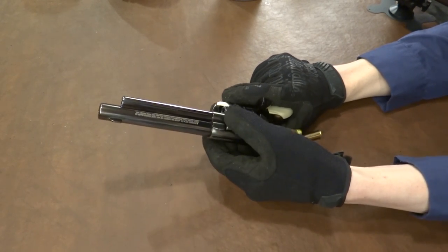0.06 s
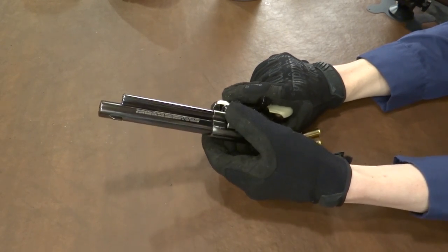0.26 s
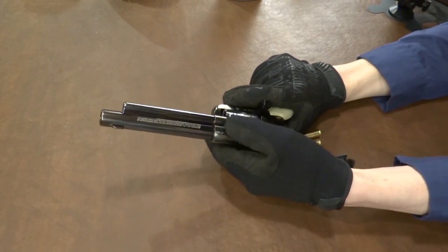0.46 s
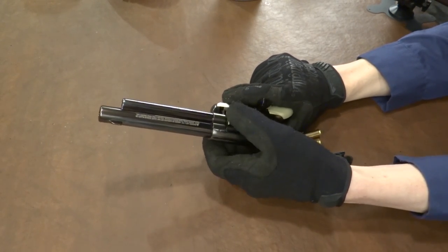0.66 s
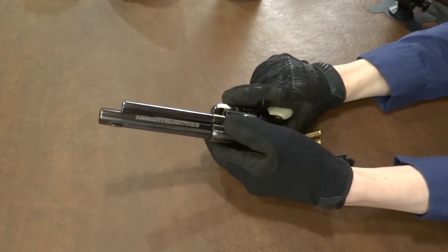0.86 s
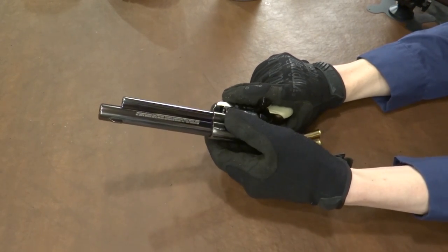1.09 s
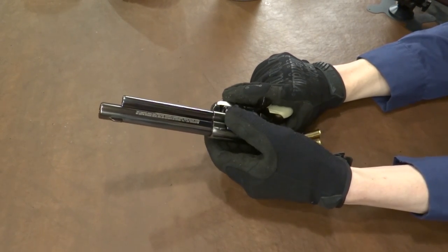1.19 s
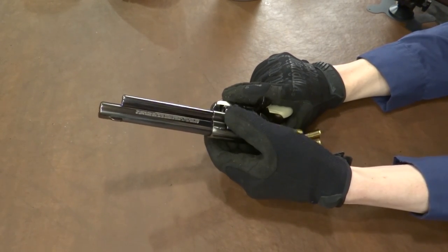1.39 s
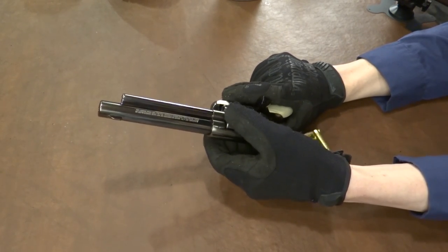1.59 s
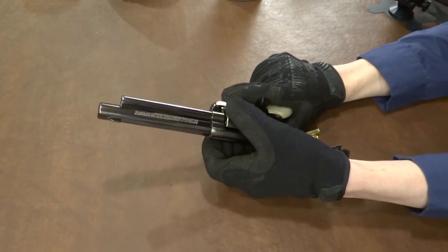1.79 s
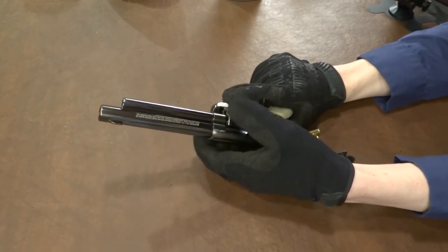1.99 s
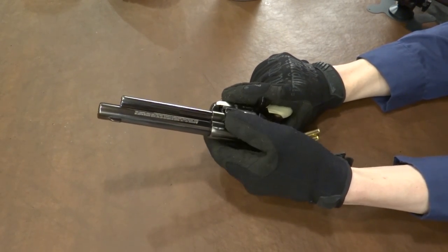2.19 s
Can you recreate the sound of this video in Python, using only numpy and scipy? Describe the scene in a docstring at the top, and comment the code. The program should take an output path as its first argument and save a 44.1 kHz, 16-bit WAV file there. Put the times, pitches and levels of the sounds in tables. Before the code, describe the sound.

A revolver-style air gun clicks as two brass shells drop onto a wooden table.

```python
"""Two brass shells drop from a revolver-style air gun: each ticks sharply, thumps a wooden table, bounces.
Gloved hands work the action around the drops. The cylinder drags, its ratchet clicks in runs, its stop
drops in and catches snap, each click a crack plus the ring of the struck part. Sliding metal adds grit.
The room is quiet and slightly live, with a low rumble under it all."""
import sys
import numpy as np
from scipy import signal
from scipy.fft import rfft, irfft, next_fast_len
from scipy.io import wavfile
from scipy.ndimage import uniform_filter1d, map_coordinates

SR = 44100
rng = np.random.default_rng(int(sys.argv[2]) if len(sys.argv) > 2 else 0)


def wav_record(signal):
    """Record a signal, one row per channel, as 16-bit PCM in the file named by sys.argv[1]."""
    frames = np.transpose(np.atleast_2d(signal))
    bounded = np.clip(frames, -1, 1)
    # unit amplitude maps onto the largest positive 16-bit level
    quanta = np.round(bounded * 32767).astype(np.int16)
    wavfile.write(sys.argv[1], SR, quanta)


N = 99225
T = np.arange(int(.8 * SR)) / SR  # time axis of one hit, s

# room tone colour (f/Hz, level/dB)
ROOM_TONE_EQ = [(15, -9), (30, -6.5), (50, 3), (85, 0), (140, -7.5), (210, -10), (300, -16), (450, -23),
                (700, -21.5), (950, -24), (1300, -32.5), (2200, -36), (4000, -36.5), (9000, -36.5),
                (16000, -44)]
# reverb decay by band (f/Hz, t60/s)
REVERB_DECAY = [(200, 0.33), (1500, 0.82), (4000, 0.49), (8000, 0.26), (15000, 0.44)]

# the cylinder dragging as it turns (t/s, length/s, level/dB)
CYLINDER_DRAGS = [(.0, .11, -63), (1.162, 0.18, -71.5), (1.348, .06, -65.5)]
# metal sliding on metal (t/s, length/s, level/dB)
METAL_SLIDES = [(0.5536, 0.011, -45), (0.569, 0.0091, -53), (0.983, 0.0069, -68), (1.053, 0.0021, -83)]
# colour of a slide (f/Hz, level/dB)
SLIDE_EQ = [(200, -19), (600, 4.5), (1200, 5), (2500, 1), (5000, -1.5), (7500, -0.5), (10000, -9.5),
            (12500, -16), (16000, -41)]
# cylinder ratchet clicks (t/s, level/dB, brightness/dB per octave, decay factor)
RATCHET_HITS = [(.0026, -42.5, -0.5, 1.3), (.0292, -25.5, 0.5, 0.74), (.0446, -34, -1, 1.32),
                (.0536, -44.5, -3, 1.49), (1.1975, -65, 10.5, 1.3), (1.2035, -63.5, -8.5, 2.3),
                (1.231, -56.5, -9.5, 1.2), (1.2335, -55.5, 3, 1.6), (1.2785, -64, -13.5, 0.44),
                (1.3485, -34.5, 1, 1), (1.372, -30.5, -1, 1.12), (1.386, -32, -2.5, 0.37),
                (1.395, -42, -6, 1.7)]
# ring of the gun frame (f/Hz, level/dB, t60/s)
FRAME_MODES = [(1275, -18, 0.035), (2370, -27, 0.051), (3260, -8.5, 0.021), (5093, -5.5, 0.021),
               (5450, 0, 0.0077), (6400, -31.5, 0.015), (6590, 3.5, 0.0071), (7400, -16, 0.0051),
               (8950, -8.5, 0.012), (9900, -5.5, 0.0092)]
# colour of the frame's crack (f/Hz, level/dB)
FRAME_CRACK_EQ = [(300, -35), (1800, -17.5), (4200, -10.5), (5500, -2.5), (7300, 3.5), (10000, -18.5),
                  (11500, -20), (16000, -40)]
# the cylinder stop dropping in after a run (t/s, level/dB, brightness/dB per octave, decay factor)
STOP_HITS = [(.1161, -32, 1, 0.87), (1.4088, -25.5, 3, 0.98), (1.454, -34.5, -1, 1.2)]
# ring of the stop (f/Hz, level/dB, t60/s)
STOP_MODES = [(1220, -23.5, 0.049), (2550, -11, 0.053), (3280, -28, 0.023), (5670, 0, 0.017),
              (6450, -8, 0.019), (6840, 2, 0.015), (7700, -2.5, .016), (9270, -2.5, 0.0097),
              (10740, -13, 0.016), (13200, -24, .012)]
# colour of the stop's crack (f/Hz, level/dB)
STOP_CRACK_EQ = [(300, -13), (1800, -6), (4200, -3), (5500, 0.5), (7300, 0.5), (10000, -9), (12500, -14),
                 (16000, -24)]
# catches snapping home (t/s, level/dB, brightness/dB per octave, decay factor)
CATCH_HITS = [(.6577, -30.5, 0, 0.87), (.6758, -49, -7.5, 1.2), (1.9193, -30.5, 1, 0.9),
              (1.9405, -49, -5.5, 0.82)]
# ring of a catch (f/Hz, level/dB, t60/s)
CATCH_MODES = [(1236, -18, 0.037), (2280, -12, 0.045), (3200, -4, 0.012), (4520, -5, 0.019),
               (6500, -12, .012), (6890, -4, .012), (8890, -2, 0.015), (12020, -12, 0.012)]
# colour of a catch's crack (f/Hz, level/dB)
CATCH_CRACK_EQ = [(300, -14.5), (1500, -11), (4000, -4), (8500, -4), (10500, -14.5), (13000, -14.5),
                  (16000, -30)]

# shells landing on the table (t/s, level/dB, low-pass f/Hz, room tail level/dB)
LANDINGS = [(0.2027, -15.5, 1860, -2), (0.2486, -25.5, 2180, -2), (.2768, -36, 1190, -1.5),
            (1.529, -20, 423, -3), (1.556, -21, 2840, -2), (2.0817, -40.5, 440, -7.5)]
# body of the table top (f/Hz, level/dB, t60/s)
TABLE_MODES = [(99.2, -15.5, 0.11), (313, -2.5, 0.024), (392, -5, 0.21), (503, 2, 0.064), (769, 8, 0.0096),
               (1058, -2, 0.022), (1313, 2.5, 0.036), (1468, -4.5, 0.023), (1556, -4, 0.021),
               (2127, -1, 0.013), (2380, -0.5, 0.0088)]
# long resonances a thump leaves in the room (f/Hz, level/dB, t60/s)
BOOM_MODES = [(107, -31, .9), (256, -24, .55), (391, -17, .33), (524, -21, .48), (677, -27, .62),
              (812, -24, .5), (894, -28, .55), (1078, -25, .48), (1197, -27, .45), (1260, -25, .42),
              (1328, -21, .35)]
# colour of the noisy wash after a thump (f/Hz, level/dB)
WASH_EQ = [(50, -34), (85, 0), (140, 1), (200, -9.5), (270, -2), (600, -2), (1300, -2), (1700, -9),
           (2200, -12), (3000, -21), (4500, -60.5), (9000, -74)]
# a shell's rim striking (t/s, level/dB, ping f/Hz, hiss level/dB, overtone level/dB)
RIM_HITS = [(0.2005, -15, 6730, -14.5, -30.5), (.2470, -31, 7200, -13, -28.5), (.2740, -28, 6200, -15, -12),
            (0.292, -37, 7360, -11, -18), (.3116, -36.5, 6300, -30, -25), (.3240, -48.5, 6660, -2.5, -25),
            (.3346, -48, 7000, -10, -24), (1.5281, -13.5, 5780, -7.5, -21), (1.553, -11.5, 7340, -19.5, 3),
            (1.5610, -20, 7200, -0.5, -19.5), (1.5800, -14, 7560, -31, -5),
            (1.5905, -21.5, 7700, -9, -13.5), (1.6179, -26, 7460, -9.5, -47),
            (1.6323, -13.5, 7800, -21, -26), (1.6374, -13.5, 8240, -34, -9), (1.6397, -23.5, 8340, -8, -32),
            (1.6466, -25, 8050, -23, -22.5), (1.6508, -32, 8200, -22, -13),
            (1.8104, -22.5, 8250, -21.5, -16), (1.8135, -23, 8450, -41.5, -16),
            (1.8154, -35, 8060, -17, -9.5), (1.8183, -25, 8280, -22, -32), (1.8217, -41, 8340, -26, -15),
            (2.0774, -35, 6560, -13.5, -22), (2.105, -47.5, 6800, -11, -20)]
# colour of the rim's contact hiss (f/Hz, level/dB)
RIM_HISS_EQ = [(300, -20), (1500, 9.5), (3200, -7), (5200, -0.5), (7300, 6), (9800, 6.5), (12000, 0),
               (16000, -15.5)]


def amp(db):
    """Decibels to gain."""
    return 10 ** (np.asarray(db) / 20)


def unit(x):
    """Scale to rms 1."""
    return x / np.sqrt(np.mean(x ** 2) + 1e-20)


def along(points, hz):
    """Read a (f/Hz, value) curve on a log frequency axis."""
    f, v = np.transpose(points)
    return np.interp(np.log(hz + 1), np.log(f + 1), v)


def filtered(x, response):
    """Zero-phase EQ; response maps Hz to gain."""
    size = next_fast_len(len(x) + 8192)
    return irfft(rfft(x, size) * response(np.fft.rfftfreq(size, 1 / SR)), size)[:len(x)]


def noise(eq, size):
    """Coloured noise of rms 1."""
    return unit(filtered(rng.standard_normal(size), lambda hz: amp(along(eq, hz))))


def lowpass(x, hz, order):
    """Causal low-pass."""
    return signal.sosfilt(signal.butter(order, hz, fs=SR, output="sos"), x)


def fade(t60):
    """Decay envelope, 60 dB down after t60 seconds."""
    return np.exp(-np.log(1000) * T / t60)


def rise(attack_s):
    """Attack envelope."""
    return 1 - np.exp(-T / attack_s)


def gate(length_s, attack_s, release_s):
    """Attack, hold and release envelope."""
    return rise(attack_s) * np.exp(-np.maximum(T - length_s, 0) / release_s)


def ringing(modes):
    """A struck body: one dying sine per mode."""
    return sum(amp(db) * fade(t60) * np.sin(2 * np.pi * hz * T) for hz, db, t60 in modes)


def burst(eq, t60):
    """A dying puff of noise whose energy is set by its decay time."""
    puff = noise(eq, len(T)) * fade(t60)
    return puff * np.linalg.norm(fade(t60)) / np.linalg.norm(puff)


def snap(eq, t60):
    """One clean pulse with the colour and energy of a burst."""
    pulse = filtered(signal.unit_impulse(len(T), 32), lambda hz: amp(along(eq, hz)))
    return pulse * np.linalg.norm(fade(t60)) / np.linalg.norm(pulse)


def add(track, s, sound):
    """Mix a sound in at s seconds."""
    start = round(s * SR)
    track[start:start + len(sound)] += sound[:N - start]


def room_tone(level_db=-56.5, swing_db=1.95, wobble_hz=8):
    """The bed: faint steady hiss over a slowly wavering rumble."""
    wobble_points = rng.standard_normal(int(N * wobble_hz / SR) + 4)
    wobble = map_coordinates(wobble_points, [np.arange(N) * wobble_hz / SR])
    air = noise(ROOM_TONE_EQ, N)
    rumble = filtered(air, lambda hz: hz < 200)
    return amp(level_db) * (air + rumble * (amp(swing_db * wobble) - 1))


def reverb(x, early_db=-3.5, predelay_s=.004):
    """Wet only: reflections off near walls and a diffuse tail whose mids hang longest."""
    hz, t, bands = signal.stft(rng.standard_normal(len(T)), SR, nperseg=256)
    decay = np.exp(-np.log(1000) * t / along(REVERB_DECAY, hz)[:, None])
    tail = signal.istft(bands * decay, SR, nperseg=256)[1][:len(T)]
    early = rng.standard_normal(len(T)) * fade(t60=.06)
    impulse = tail / np.linalg.norm(tail) + amp(early_db) * early / np.linalg.norm(early)
    return signal.fftconvolve(x, np.pad(impulse, (round(predelay_s * SR), 0)))[:len(x)]


def cylinder_drags(wet_db=-8):
    """The turning cylinder rubs and makes the frame ring faintly."""
    out = np.zeros(N)
    frame = ringing(FRAME_MODES)
    for s, length, db in CYLINDER_DRAGS:
        friction = signal.fftconvolve(rng.standard_normal(len(T)), frame)[:len(T)]
        rub = unit(lowpass(friction, hz=1200, order=1)) * gate(length, attack_s=.005, release_s=.0052)
        add(out, s, amp(db) * (rub + amp(wet_db) * reverb(rub)))
    return out


def metal_slides(grit_db=1.33, wet_db=-8):
    """Parts rub briefly: gritty noise that bites at once and lets go."""
    out = np.zeros(N)
    for s, length, db in METAL_SLIDES:
        roughness = unit(uniform_filter1d(rng.standard_normal(len(T)), size=40))
        grit = unit(amp(grit_db * roughness))
        rub = noise(SLIDE_EQ, len(T)) * grit * gate(length, attack_s=.00032, release_s=.001)
        add(out, s, amp(db) * (rub + amp(wet_db) * reverb(rub)))
    return out


def action_clicks(hits, modes, crack_eq, wet_db):
    """Each click is a short crack and the damped ring of the struck part, detuned a little by the grip."""
    out = np.zeros(N)
    attack, grip_detune = rise(attack_s=.0004), .0047
    for s, db, tilt_db, stretch in hits:
        ring = np.zeros(len(T))
        for hz, mode_db, t60 in modes:
            jitter_db, shift, phase = rng.standard_normal(3)
            partial = np.sin(2 * np.pi * (hz * (1 + grip_detune * shift) * T + phase))
            ring += amp(mode_db + jitter_db) * attack * fade(t60 * stretch) * partial
        crack_t60 = .013 * stretch
        direct = ring + amp(.5) * burst(crack_eq, crack_t60) * attack
        send = amp(-2) * ring + amp(-.5) * snap(crack_eq, crack_t60)
        click = direct + amp(wet_db) * reverb(send)
        # brightness pivots at 6 kHz and levels off below 1 kHz
        tilted = filtered(click, lambda hz: amp(tilt_db * np.log2(np.maximum(hz, 1000) / 6000)))
        add(out, s, amp(db) * tilted)
    return out


def table_thumps(slap_delay_s=.0086, slap_db=-2, low_cut_hz=62):
    """The table top knocks under each landing; a near surface slaps back and the room booms on."""
    out = np.zeros(N)
    knock = lowpass(-ringing(TABLE_MODES) * rise(attack_s=.0005), hz=2300, order=6)
    boom = amp(1) * ringing(BOOM_MODES)
    for s, db, soft_hz, tail_db in LANDINGS:
        wash = amp(-12) * burst(WASH_EQ, t60=.59)
        tail = (boom + wash) * rise(attack_s=.002)
        add(out, s, amp(db) * lowpass(knock + amp(tail_db) * tail, soft_hz, order=2))
        slap = lowpass(lowpass(knock, soft_hz, order=2), hz=1000, order=1)
        add(out, s + slap_delay_s, amp(db + slap_db) * slap)
    # low cut keeps the thumps free of deep bass
    return signal.sosfilt(signal.butter(2, low_cut_hz, "highpass", fs=SR, output="sos"), out)


def shell_ticks(overtone_hz=13140, wet_db=-13.5):
    """A brass rim strikes: a ping of a few cycles, its overtone and a tiny hiss, almost dry."""
    out = np.zeros(N)
    for s, db, ping_hz, hiss_db, overtone_db in RIM_HITS:
        ping = fade(t60=.0017) * np.sin(2 * np.pi * ping_hz * T)
        overtone = amp(overtone_db) * fade(t60=.0015) * np.sin(2 * np.pi * overtone_hz * T)
        hiss = amp(hiss_db) * burst(RIM_HISS_EQ, t60=.0098)
        tick = (1.4 * (ping + overtone) + hiss) * rise(attack_s=.000049)
        send = lowpass(tick, hz=11000, order=1)  # the room answers duller than the tick
        add(out, s, amp(db) * (tick + amp(wet_db) * reverb(send)))
    return out


def scene():
    """Mono mix of gun action, shells, table and room tone."""
    ratchet = action_clicks(RATCHET_HITS, FRAME_MODES, FRAME_CRACK_EQ, wet_db=-8.5)
    stops = action_clicks(STOP_HITS, STOP_MODES, STOP_CRACK_EQ, wet_db=-7)
    catches = action_clicks(CATCH_HITS, CATCH_MODES, CATCH_CRACK_EQ, wet_db=-7)
    gun = ratchet + stops + catches + metal_slides() + cylinder_drags()
    return (gun + shell_ticks() + table_thumps() + room_tone())[None]


def record(dry):
    """Brick-wall high cut on the master."""
    top_hz = 15900
    return np.array([filtered(channel, lambda hz: hz < top_hz) for channel in dry])


dry = scene()
out = record(dry)
wav_record(out)
```